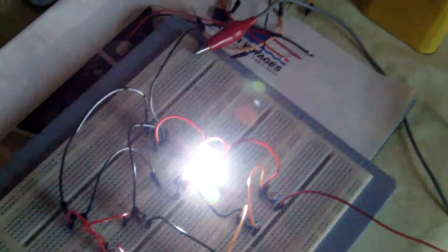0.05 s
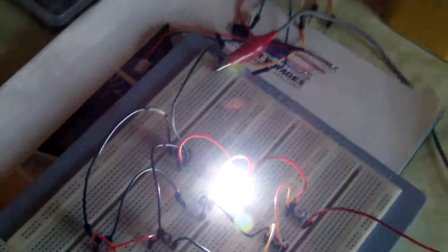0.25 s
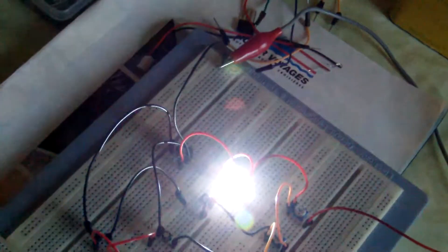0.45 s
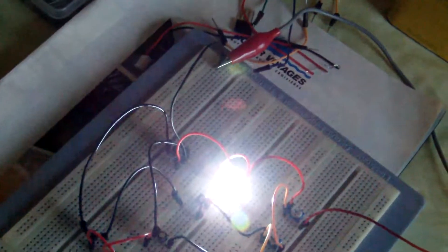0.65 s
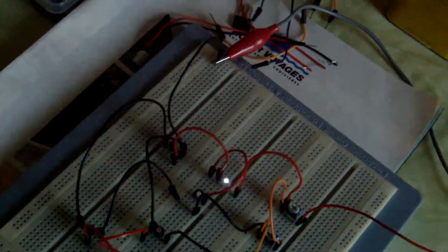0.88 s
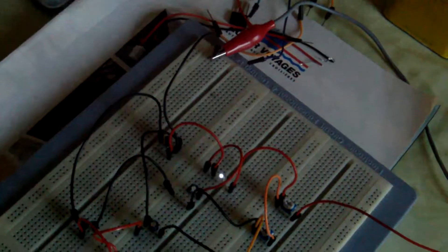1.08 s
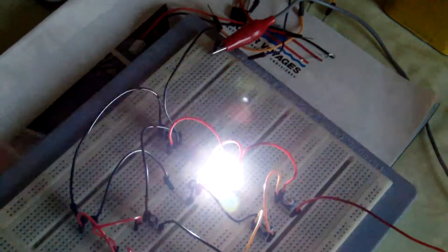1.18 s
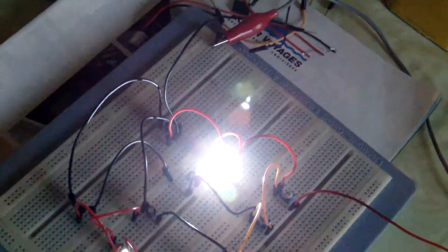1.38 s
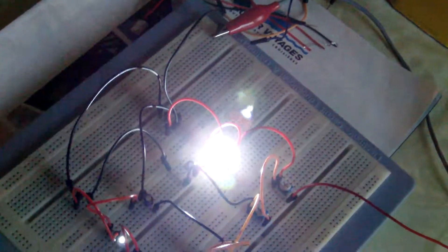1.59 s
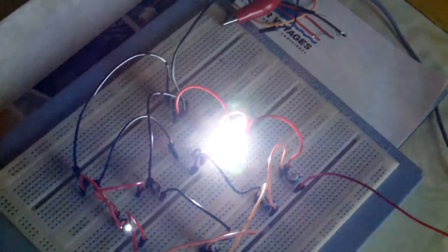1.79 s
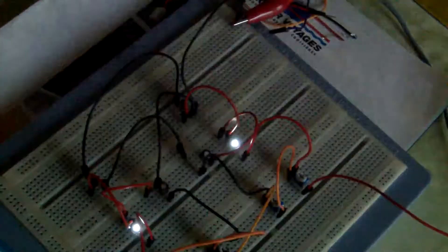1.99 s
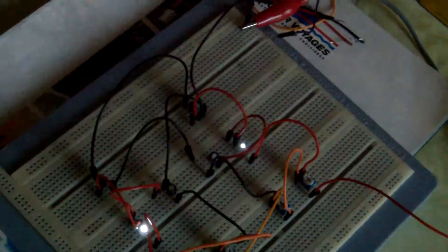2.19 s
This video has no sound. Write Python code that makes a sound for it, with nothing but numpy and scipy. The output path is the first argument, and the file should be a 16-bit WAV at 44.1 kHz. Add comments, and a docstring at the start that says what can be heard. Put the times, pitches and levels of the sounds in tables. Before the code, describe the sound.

In a quiet room, a nearby switch gives two light ticks and one sharp click with a brief echo. Soft hiss and a very high, fluttering whine continue, while three faint distant taps pass and a low rumble swells.

```python
"""A quiet room: from the start there is hiss, a low rumble and a thin, very high whine like a picture
tube's line scan. The whine's level is also made to pulse 13 times a second. Almost at once a small switch
close by gives two light ticks, then a sharp snap with a low thump and a rebound. Its casing rings for
milliseconds, its spring a little longer, and the board under it knocks softly, all with a short echo.
Three faint taps follow further off, and from about the second of them the rumble swells in waves."""
import sys
import numpy as np
from scipy import signal
from scipy.fft import rfft, irfft
from scipy.io import wavfile
from scipy.ndimage import uniform_filter1d

SR = 44100
rng = np.random.default_rng(int(sys.argv[2]) if len(sys.argv) > 2 else 0)


def wav_record(signal):
    """Record a signal, one row per channel, as 16-bit PCM in the file named by sys.argv[1]."""
    frames = np.transpose(np.atleast_2d(signal))
    bounded = np.clip(frames, -1, 1)
    # unit amplitude maps onto the largest positive 16-bit level
    quanta = np.round(bounded * 32767).astype(np.int16)
    wavfile.write(sys.argv[1], SR, quanta)


N = 99225  # 2.25 s


def from_db(db):
    """Turn decibels into a number to multiply a sound by."""
    return 10 ** (np.asarray(db) / 20)


def unit_level(x):
    """Scale a sound so that its average level (rms) is 1."""
    return x / np.sqrt(np.mean(x ** 2))


def since(start):
    """Seconds since a moment, zero before it."""
    return np.maximum(np.arange(N) / SR - start, 0)


def noise(colour):
    """Noise of level 1; the colour table says how strong its low and high parts are."""
    hz, db = np.array(colour).T
    freqs = np.maximum(np.fft.rfftfreq(N, 1 / SR), 1)
    gain = from_db(np.interp(np.log(freqs), np.log(hz), db))
    return unit_level(irfft(rfft(rng.standard_normal(N)) * gain, N))


def wander(rate_hz):
    """A slow random wobble: random steps, smoothed twice."""
    hold = int(SR / rate_hz)
    steps = np.repeat(rng.standard_normal(N // hold + 1), hold)
    return unit_level(uniform_filter1d(uniform_filter1d(steps, hold), hold)[:N])


def fade(age, fade_s, contact_s=0.00041):
    """The level of a hit: it rises during the contact, then falls 60 dB in the fade time."""
    rise = 1 - np.exp(-(age / contact_s) ** 2)
    return rise * np.exp(-np.log(1000) * age / fade_s)


def ring(tones, age):
    """A struck part rings with several dying tones; every other one starts by swinging down."""
    return sum((-1) ** k * from_db(db) * fade(age, fade_s) * np.sin(2 * np.pi * hz * age)
               for k, (hz, db, fade_s) in enumerate(tones))


# colour of the hiss: f/Hz, relative level/dB
HISS_COLOUR = [(12, -20), (20, -8), (33, -10), (54, -13.5), (124, -15.5), (146, -18.5), (228, -20),
               (262, -23.5), (292, -19.5), (396, -25), (480, -25.5), (790, -29), (1040, -31.5),
               (1230, -32.5), (6400, -41.5), (7600, -44.5), (8200, -47.5), (8900, -43.5), (13600, -43),
               (14800, -38)]
def hiss():
    """Steady, soft noise, strongest in the bass."""
    return from_db(-53.5) * noise(HISS_COLOUR)


# how loud the rumble is over time: t/s, level/dB
RUMBLE_SWELLS = [(0, -65), (0.8, -78), (0.89, -50.5), (0.95, -72), (1.32, -63), (1.39, -47), (1.75, -55),
                 (1.84, -57), (1.96, -45.5), (2.25, -51)]
def rumble(pitch_hz=21.3):
    """A very low vibration that swells and sinks while its pitch wanders."""
    times, db = np.array(RUMBLE_SWELLS).T
    level = from_db(np.interp(since(0), times, db))
    cycles = np.cumsum(pitch_hz * (1 + 0.047 * wander(rate_hz=37.3))) / SR
    return level * unit_level(np.sin(2 * np.pi * cycles))


def whine(line_hz=15734.5, sweep_hz=59.94, pulse_hz=13.02):
    """A thin, very high whine like a picture tube's line scan. Separately, its level is made to pulse."""
    t = since(0)
    slip = 0.33 * (sweep_hz * t % 1)  # the wave falls behind, then snaps back once a screen sweep
    tone = np.sin(2 * np.pi * (line_hz * t - slip))
    pulse = 1 + 0.48 * np.cos(2 * np.pi * pulse_hz * (t - 0.043))
    dip_width = 0.3 * np.pi / 2
    dips = np.exp(-(np.sin(2 * np.pi * sweep_hz * t) / dip_width) ** 2)
    flutter = 1 - 0.59 * dips  # the level dips briefly twice a sweep
    return from_db(-56.5) * unit_level(pulse * flutter * tone)


# hits inside the switch: t/s, casing level/dB, crack level/dB, spring level/dB
SWITCH_HITS = [(0.1691, -63, -33, -88), (0.1952, -43, -26.5, -77), (0.2, -51, -44, -100),
               (0.2356, -13.5, -25.5, -55), (0.2428, -29.5, -62, -87), (0.2620, -45.5, -59, -94)]
# tones of the casing: f/Hz, relative level/dB, fade time/s
CASING_TONES = [(2087, -6, 0.011), (3017, -11.5, 0.013), (3513, -6.5, 0.011), (4580, 5.5, 0.0068),
                (5155, -1.5, 0.011), (6020, -6, 0.01), (6570, 1, 0.0074), (7330, -10.5, 0.0089),
                (9310, 0, 0.0056), (10760, -6.5, 0.006), (11480, -13, 0.0086), (13200, -17, 0.01)]
# tones of the spring: f/Hz, relative level/dB, fade time/s
SPRING_TONES = [(2982, 4.5, .14), (4237, -10, .35), (4850, -2, .15), (5259, 7, .13), (6255, 1, .42)]
# colour of the crack: f/Hz, relative level/dB
CRACK_COLOUR = [(200, -1.5), (900, 0.5), (2050, -5), (2550, -10), (4500, -6.5), (5400, -3.5), (6600, 3),
                (8000, -17.5), (9600, -15), (10800, -6), (12500, -9), (16000, -8)]
def switch():
    """Each hit makes a short crack of noise and sets the casing and the spring ringing."""
    out = np.zeros(N)
    for start, casing_db, crack_db, spring_db in SWITCH_HITS:
        age = since(start)
        out += from_db(casing_db) * ring(CASING_TONES, age)
        out += from_db(spring_db) * ring(SPRING_TONES, age)
        out += from_db(crack_db) * noise(CRACK_COLOUR) * fade(age, fade_s=0.012)
    return out


# soft knocks on the board: t/s, level/dB
BOARD_KNOCKS = [(0.1712, -44.5), (0.1756, -39), (0.1956, -47), (0.2001, -40.5), (0.2085, -45),
                (0.2241, -40.5), (0.2366, -40), (0.2443, -37), (0.2635, -51.5)]
# tones of the board: f/Hz, relative level/dB, fade time/s
BOARD_TONES = [(280, -14, 0.033), (395, -5.5, 0.07), (555, -4.5, 0.05), (900, -2, 0.015), (1030, -8, 0.013),
               (1310, -4, 0.019), (1640, -6, 0.016)]
def board():
    """The board that carries the switch knocks dully, with one low thump under the snap."""
    knocks = sum(from_db(db) * ring(BOARD_TONES, since(start)) for start, db in BOARD_KNOCKS)
    thump = ring([(61, -44, 0.12)], since(0.237))  # f/Hz, level/dB, fade time/s
    return knocks + thump


# colour of the echo: f/Hz, relative level/dB
ECHO_COLOUR = [(200, 6), (550, 10.5), (1500, -7), (2200, -6), (3500, -7), (4700, -7.5), (6500, -14),
               (15000, -13)]
def room_echo(sound):
    """The walls of a small room send a sound back as a short, dull echo."""
    tail = noise(ECHO_COLOUR) * fade(since(0.003), fade_s=0.18)
    tail /= np.sqrt(np.sum(tail ** 2))
    return from_db(-22) * signal.fftconvolve(sound, tail)[:N]


# taps further off: t/s, level/dB
FAR_TAPS = [(0.463, -50), (0.863, -51), (1.196, -55)]
# colour of a tap: f/Hz, relative level/dB
TAP_COLOUR = [(500, -27), (950, -24), (1220, 2), (1500, -22), (3000, -27), (12000, -50)]
def taps():
    """Faint, dull taps somewhere in the room, each a short burst of noise."""
    return sum(from_db(db) * noise(TAP_COLOUR) * fade(since(start), fade_s=0.024)
               for start, db in FAR_TAPS)


def scene():
    """The switch and board with their echo, over taps, hiss, rumble and whine, in one channel."""
    near = switch() + board()
    return (near + room_echo(near) + taps() + hiss() + rumble() + whine())[None]


def record(dry):
    """A steep filter cuts the very highest treble."""
    treble_cut = signal.ellip(10, 0.1, 80, 15800, fs=SR, output="sos")  # above 15800 Hz
    return signal.sosfilt(treble_cut, dry)


dry = scene()
out = record(dry)
wav_record(out)
```